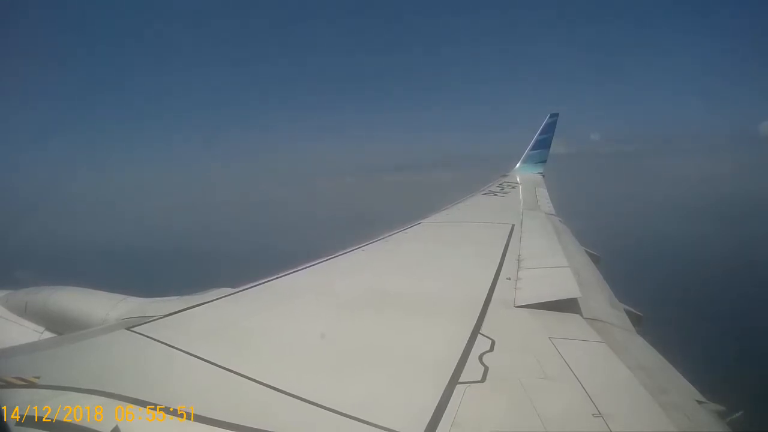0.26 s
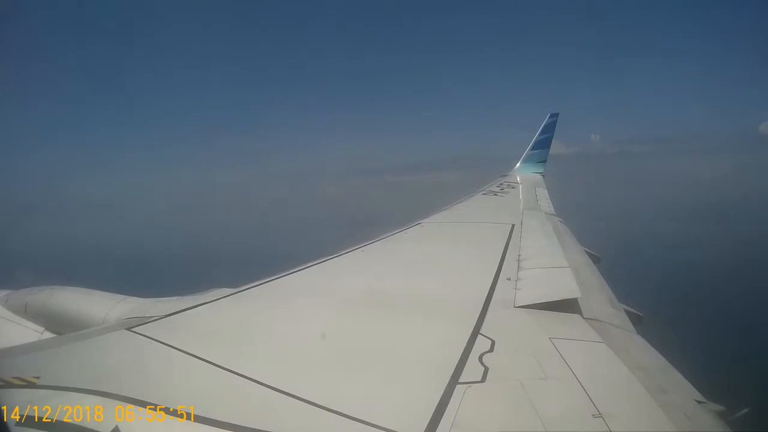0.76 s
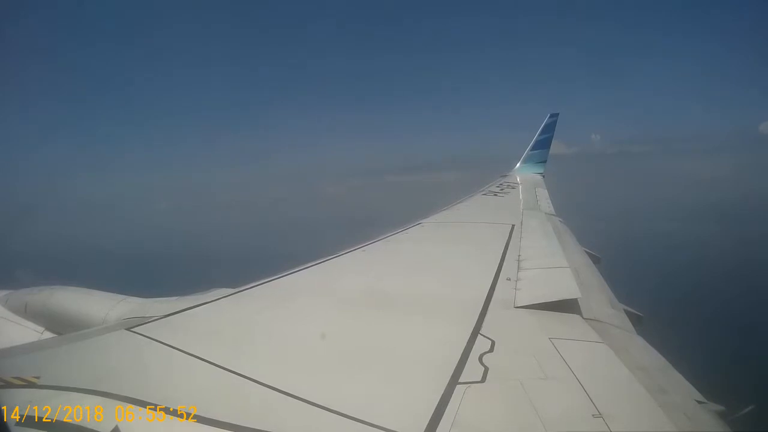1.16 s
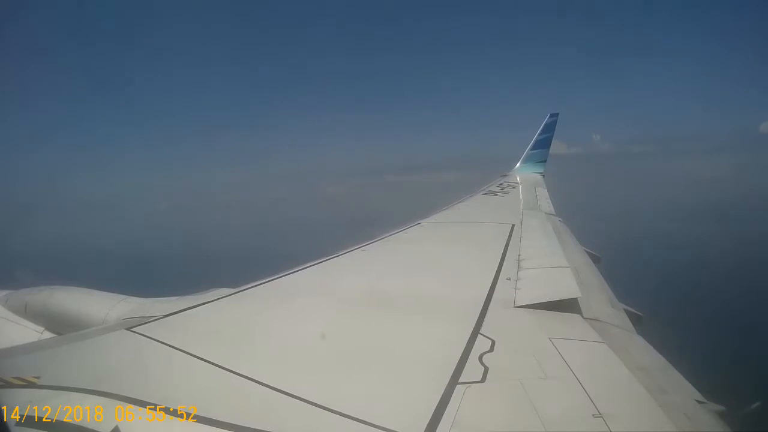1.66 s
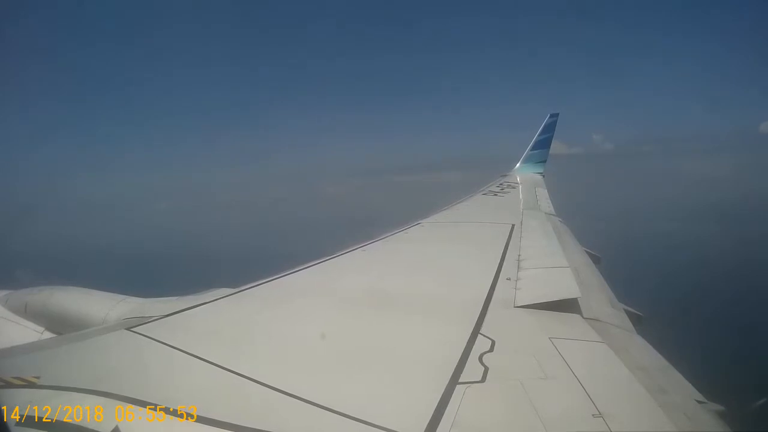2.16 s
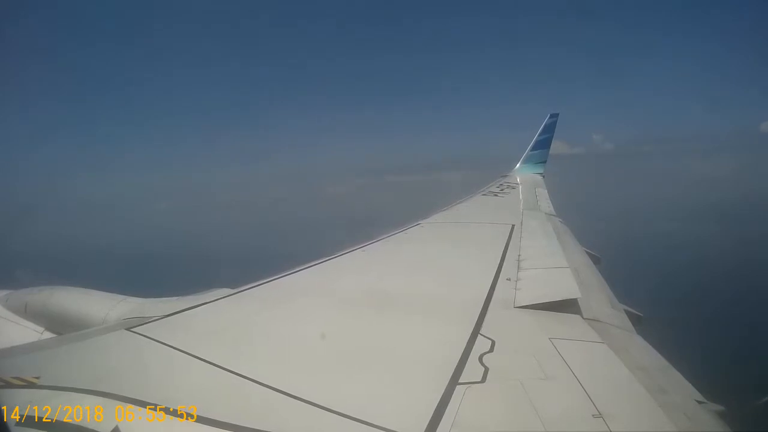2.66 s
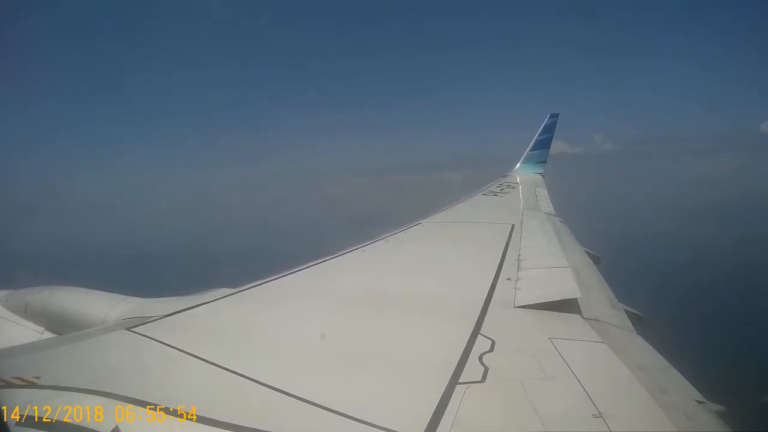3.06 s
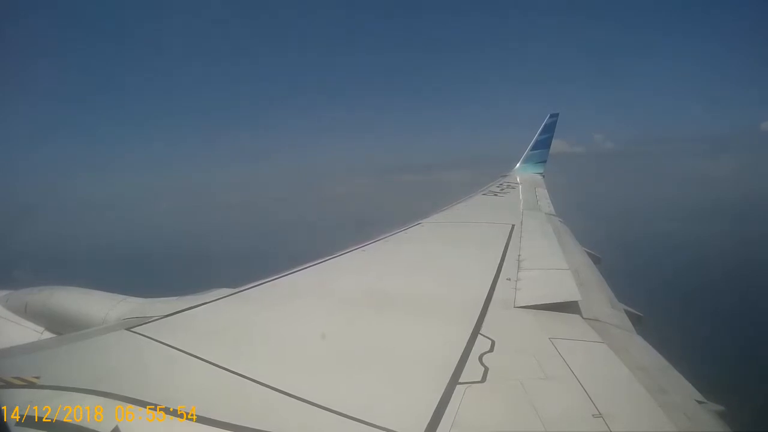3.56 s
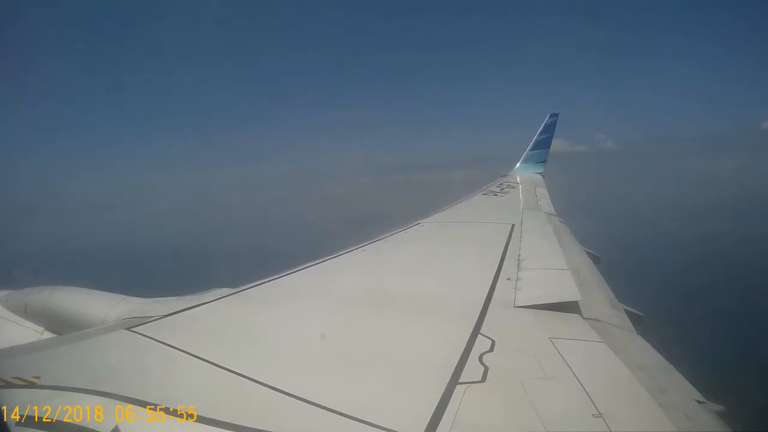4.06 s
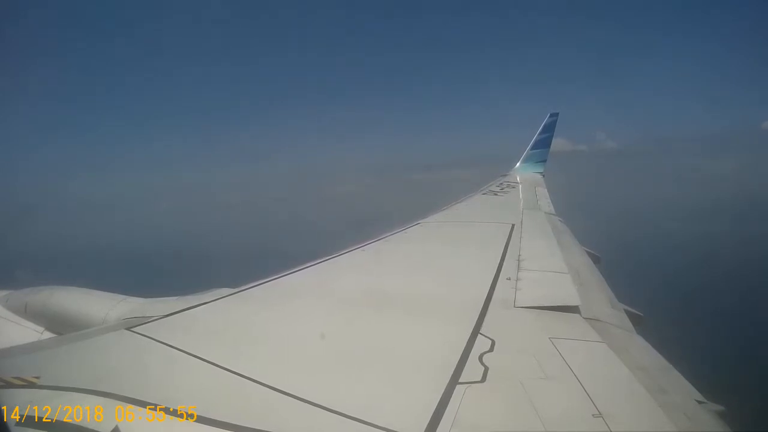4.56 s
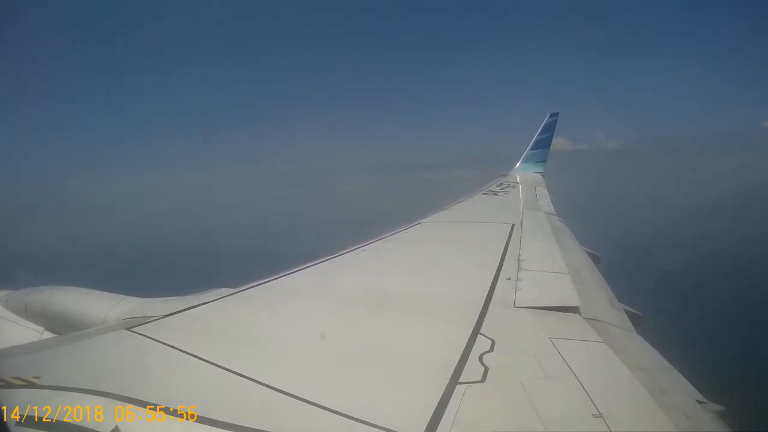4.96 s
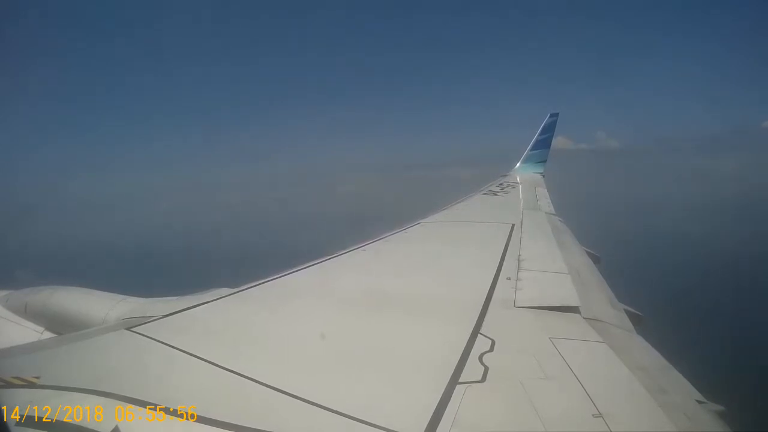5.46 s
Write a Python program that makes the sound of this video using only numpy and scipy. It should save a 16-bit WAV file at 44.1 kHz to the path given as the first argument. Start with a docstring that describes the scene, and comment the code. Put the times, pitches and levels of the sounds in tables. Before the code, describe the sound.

Inside a jet airliner cabin in cruise, a deep, steady roar and muffled rush of air fill the sound. A mid-low hum swells and fades over engine drone and thin fan whines. A small camera resting on the wall picks up airframe rumble and faint rattling taps, which weaken after about 3.5 seconds; a few last ticks come near the end.

```python
"""Window seat of a jet airliner in cruise, a small camera held near the wall.
Throughout, coloured noise makes the jet roar and the rush of air over the skin, sinking slowly in level;
wavering sines make the tones of engine, power supply, motor and fans. From the start the camera rests on
the wall: low noise makes the rumble of the airframe, decaying case modes make the faint rattle and taps.
From 3.55 s the contact is eased off and rumble and rattle weaken; a last few taps come after 5.2 s."""
import sys
import numpy as np
from scipy import signal
from scipy.io import wavfile
from scipy.ndimage import uniform_filter1d

SR = 44100
rng = np.random.default_rng(int(sys.argv[2]) if len(sys.argv) > 2 else 0)


def field_ratio(decibels):
    """Amplitude ratio for a level in dB (20 dB per decade); scalars and array-likes work."""
    return 10 ** (np.asarray(decibels, dtype=float) / 20)


def output_pcm(signal):
    """Save a mono or channel-first signal as 16-bit PCM at the path in sys.argv[1].

    Samples are clipped to [-1, 1] before scaling.
    """
    pcm = np.clip(np.atleast_2d(signal).T, -1, 1) * 32767
    wavfile.write(sys.argv[1], SR, np.round(pcm).astype(np.int16))


N = 251370  # samples

# Ringing modes of the camera's case: pitch_hz, level_db (before the softness of the contact), t60_s
CASE_MODES = [(930, 31, .055), (1200, 25, .04), (1900, 11, .015), (3200, 5, .016), (3950, -1, .017),
              (4250, -1, .017), (4850, -3.5, .017), (5700, -11, .008), (6600, 0, .01), (7600, -4, .008),
              (8700, -3, .007), (10000, -4, .009), (11300, 1, .014), (12300, 0, .009)]


def evened(x):
    """Normalisation: scales a signal to an rms of 1."""
    return x / np.sqrt(np.mean(x ** 2) + 1e-20)


def curve(rows):
    """Linear interpolation: a control curve at every sample from rows of (time in s, value)."""
    return np.interp(np.arange(N) / SR, *np.transpose(rows))


def wander(top_hz):
    """Superposition: slow chance of rms 1 from sines of random phase, log-spread up to top_hz."""
    t = np.arange(0, N + 64, 64) / SR
    slow = 0
    for hz in top_hz * np.geomspace(.1, 1, num=16):
        slow = slow + np.sin(2 * np.pi * (hz * t + rng.random())) / np.sqrt(hz)
    return np.interp(np.arange(N) / SR, t, evened(slow))


def noise(colour, bumps=(), patchy_db=0., size=4096):
    """Spectral shaping: random short-time spectra of a given colour, with resonances and patches; rms 1."""
    hz = np.fft.rfftfreq(size, 1 / SR)
    colour_hz, colour_db = np.transpose(colour)
    shape_db = np.interp(np.log(hz + 1), np.log(colour_hz + 1), colour_db)
    for centre_hz, width_hz, peak_db in bumps:
        shape_db = shape_db + peak_db / (1 + (2 * (hz - centre_hz) / width_hz) ** 2)
    real, imaginary, patches = rng.standard_normal((4 * N // size + 5, len(hz), 3)).T
    # smooth the patches over frequency, then over time
    patches = uniform_filter1d(patches, size=12, axis=0)
    patches = evened(uniform_filter1d(patches, size=6, axis=1))
    spectra = (real + 1j * imaginary) * field_ratio(shape_db[:, None] + patchy_db * patches)
    return evened(signal.istft(spectra, nperseg=size, noverlap=3 * size // 4)[1][:N])


def tone(hz, waver_hz, orders, flutter_db):
    """Harmonic series: multiples of one wavering rotation, each with its own phase and level flutter."""
    turns = np.cumsum(hz + waver_hz * wander(2.5)) / SR
    out = 0
    for multiple, rms_db in orders:
        peak = np.sqrt(2) * field_ratio(rms_db + flutter_db * wander(2.4))
        out = out + peak * np.sin(2 * np.pi * (multiple * turns + rng.random()))
    return out


def microphone_hiss():
    """Self-noise: a stationary random signal with the microphone's own spectrum."""
    # Colour of the hiss: pitch_hz, density_db (per Hz, relative)
    hiss_colour = [(1000, -18), (4000, -0.5), (6500, -3), (9000, -4.5), (14500, -5.5), (15200, -6),
                   (15700, -13)]
    return field_ratio(-67) * noise(hiss_colour, size=1024)


def airflow():
    """Broadband flow noise: roar and rush share one swell in level, which the rush follows less."""
    # Roar through the fuselage and its trim: pitch_hz, density_db (per Hz, relative)
    roar_colour = [(32, -37.5), (68, -17.5), (80, -7.5), (103, -8), (126, -1), (140, -3.5), (175, -2),
                   (190, -4.5), (205, -5.5), (218, -8.5), (255, 0.5), (275, -5.5), (295, -3), (345, -7),
                   (360, -11), (375, -8.5), (395, -12), (412, -12), (430, -15.5), (467, -23), (700, -29),
                   (1500, -95)]
    # Rush of air over the skin and from the vents: pitch_hz, density_db (per Hz, relative)
    rush_colour = [(260, -36), (450, -1), (600, -3.5), (720, -8.5), (930, -7.5), (1150, -8.5),
                   (1400, -13.5), (1700, -16.5), (1950, -20), (2500, -25.5), (2850, -31.5), (3150, -38),
                   (3600, -38.5), (4550, -44.5), (5200, -54.5), (7000, -79.5)]
    # Broad resonances of cabin trim in the rush: pitch_hz, width_hz, peak_db
    trim = [(802.4, 69, 8), (1526, 31, 9.5), (2190, 300, 5.5), (2960, 74, 3), (3970, 320, 5),
            (4210, 270, 5), (4850, 330, 2.5)]
    start_db, fall_db_per_s, swell_rms_db = 0.72, 0.29, 0.21
    swell_db = start_db - fall_db_per_s * np.arange(N) / SR + swell_rms_db * wander(1.6)
    roar = field_ratio(-17.5 + swell_db) * noise(roar_colour, size=8192)
    rush = field_ratio(-35 + 0.73 * swell_db) * noise(rush_colour, trim, patchy_db=0.63, size=1024)
    return roar + rush


def machinery():
    """Periodic sources: line spectra of the engine, the power supply, a motor and the cooling fans."""
    # Tone families: fundamental_hz, waver_hz (rms), then rows of multiple, level_db (rms)
    engine = 173.11, .03, [(1, -26.6), (2, -40.4)]
    power = 399.76, .02, [(1, -30.4), (3, -61.5), (4, -60.8), (5, -64)]  # levels before the power_level curve
    motor = 124.93, .015, [(11, -69), (12, -49.7), (14, -63.2), (23, -84), (36, -89)]
    # How loud the power hum stands: time_s, gain_db
    power_level = [(0, 2), (.6, -2), (1.3, 1), (2.4, 1), (3.3, -0.5), (4.3, -4.5), (5.1, 1), (5.7, -4)]
    # Cooling fan whines: pitch_hz, waver_hz (rms), level_db (rms), second_harmonic_db (rms)
    fans = [(875.1, .4, -52, -75), (1467.7, .4, -57.5, -76), (1479.5, 1.6, -57, -76),
            (1765, .3, -63.4, -95), (2117, 3, -66, -95), (2625, 1, -73, -99), (2999, .8, -82, -99)]
    out = tone(*engine, flutter_db=0)
    out += field_ratio(curve(power_level)) * tone(*power, flutter_db=1.68)
    out += tone(*motor, flutter_db=0.5)
    for hz, waver_hz, first_db, second_db in fans:
        out += tone(hz, waver_hz, [(1, first_db), (2, second_db)], flutter_db=0.5)
    return out


def ring(softness_db, detune):
    """Modal decay: a tap excites the case; softness (dB per octave) weakens modes away from 4200 Hz."""
    t = np.arange(1500) / SR
    out = 0
    for (hz, mode_db, t60_s), d in zip(CASE_MODES, detune):
        decay_db = mode_db - abs(softness_db * np.log2(hz / 4200)) - 60 * t / t60_s
        detuned_hz = hz * (1 + hz / 1.8e5 * d)  # higher modes stray further
        out = out + field_ratio(decay_db) * np.sin(2 * np.pi * (detuned_hz * t + d))
    return out * (1 - np.exp(-t / .0003))  # the contact builds up over a moment


def rumble(contact_db):
    """Structure-borne vibration: the airframe's shaking as low noise whose level follows the contact."""
    # Colour of the shaking: pitch_hz, density_db (per Hz, relative)
    shake_colour = [(7, -35.5), (14, -12), (22, -4), (30, -2), (41, -0.5), (47, -1.5), (54, -2.5),
                    (66, -9.5), (90, -28), (160, -85.5)]
    level_db = -30 + contact_db + 0.5 * wander(3.3)  # comes slightly unevenly
    return field_ratio(level_db) * noise(shake_colour, size=8192)


def rattle(contact_db):
    """Shot noise: random impacts, 150 a second on average, each exciting one of twelve detuned rings."""
    impacts = rng.random(N) < 150 / SR
    strength = field_ratio(3 * np.minimum(rng.exponential(1, N), 2.2)) * impacts
    kind = rng.integers(0, 12, N)
    detunes = rng.uniform(-1, 1, (12, len(CASE_MODES)))
    out = 0
    for k, detune in enumerate(detunes):
        out = out + signal.oaconvolve(strength * (kind == k), ring(18, detune))[:N]
    clumps_db = 2.2 * wander(13)  # the rattle bunches up
    return field_ratio(-66.5 + 0.77 * contact_db + clumps_db) * evened(out)


def clear_taps():
    """Impact and rebound: each bounce repeats the tap 3.1 ms later, weaker and softer."""
    # The clearest taps: start_s, level_db (gain of the ring), softness_db (per octave), bounces
    taps = [(.2260, -54, 14, 0), (.5548, -49, 10, 1), (.8050, -54, 6, 0), (1.0333, -54, 14, 0),
            (1.2193, -51, 14, 0), (1.3665, -57, 3, 0), (1.4092, -49, 12, 0), (1.4665, -54, 14, 1),
            (1.5543, -53, 14, 0), (1.7498, -54, 8, 0), (2.2065, -49, 14, 1), (2.3674, -53, 14, 0),
            (2.5608, -48, 8, 0), (2.5682, -49, 8, 0), (2.7142, -52, 9, 0), (2.7384, -53, 12, 0),
            (2.7458, -55, 4, 0), (2.8362, -51, 14, 0), (2.8650, -50, 12, 0), (2.8997, -56, 4, 0),
            (3.0815, -54, 6, 0), (3.1274, -53, 4, 0), (3.1766, -52, 14, 0), (3.2403, -52, 14, 0),
            (3.2582, -53, 14, 0), (3.2864, -53, 14, 0), (3.3745, -53, 8, 0), (3.4081, -53, 14, 0),
            (3.5168, -51, 12, 0), (5.2490, -52, 0, 3), (5.2513, -47, 11, 0), (5.2588, -57, 12, 0),
            (5.3950, -53, 12, 0)]
    gap_s, bounce_db, softer_db = .0031, -1.5, 2.5
    out = np.zeros(N)
    for start_s, level_db, softness_db, bounces in taps:
        detunes = rng.uniform(-1, 1, (bounces + 1, len(CASE_MODES)))
        for k, detune in enumerate(detunes):
            at = round((start_s + k * gap_s) * SR)
            out[at:at + 1500] += field_ratio(level_db + k * bounce_db) * ring(softness_db + k * softer_db, detune)
    return out


def camera_on_wall():
    """Mechanical coupling: rumble and rattle follow the contact with the wall; clear taps stand out."""
    # How firmly the camera rests on the wall, eased off from 3.55 s: time_s, contact_db
    contact = [(0, -2.5), (1.2, -1.5), (3.55, 1.5), (3.85, -2.5), (5.7, -10)]
    contact_db = curve(contact)
    return rumble(contact_db) + rattle(contact_db) + clear_taps()


def scene():
    """Linear superposition: all that reaches the microphone, in one channel."""
    return (airflow() + machinery() + camera_on_wall())[None]


def top_cut(x):
    """Nothing passes above the cut-off."""
    return signal.sosfilt(signal.butter(12, 15720, fs=SR, output="sos"), x)


def record(dry):
    """Additive noise: the microphone's hiss joins the sound of the cabin."""
    mix = dry + microphone_hiss()
    return top_cut(mix)


dry = scene()
out = record(dry)
output_pcm(out)
```